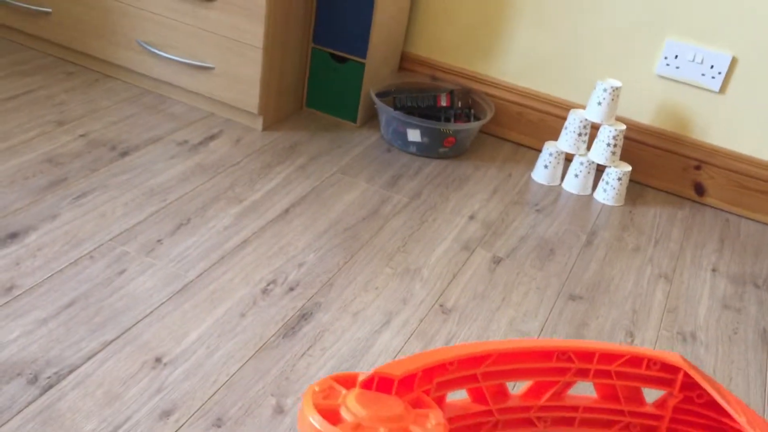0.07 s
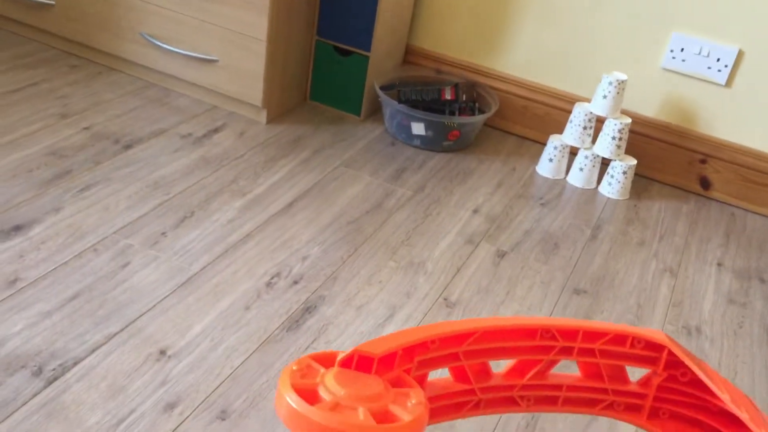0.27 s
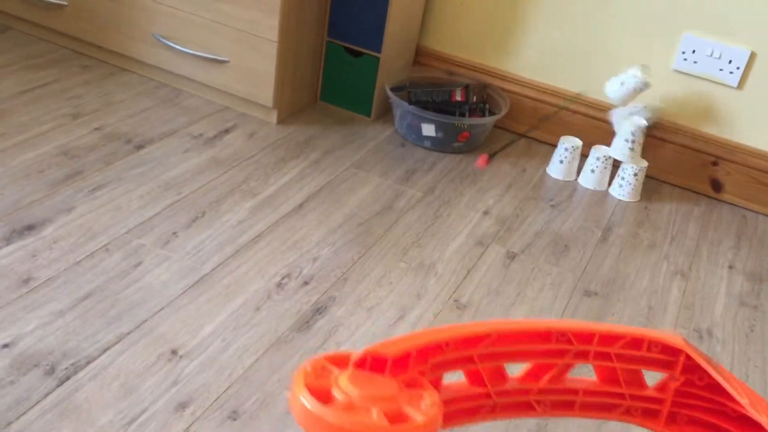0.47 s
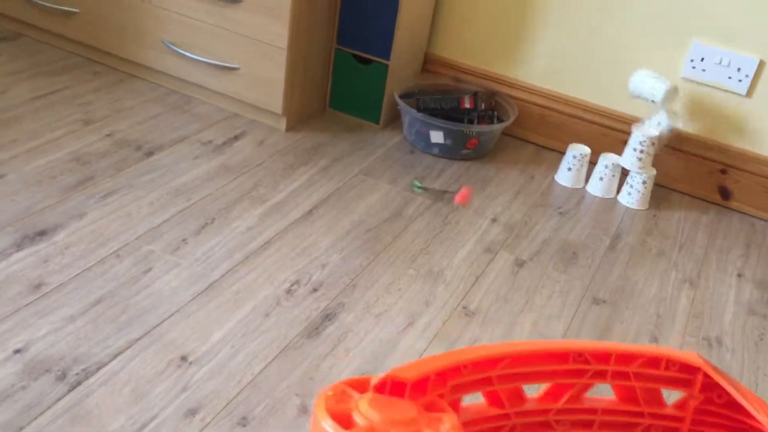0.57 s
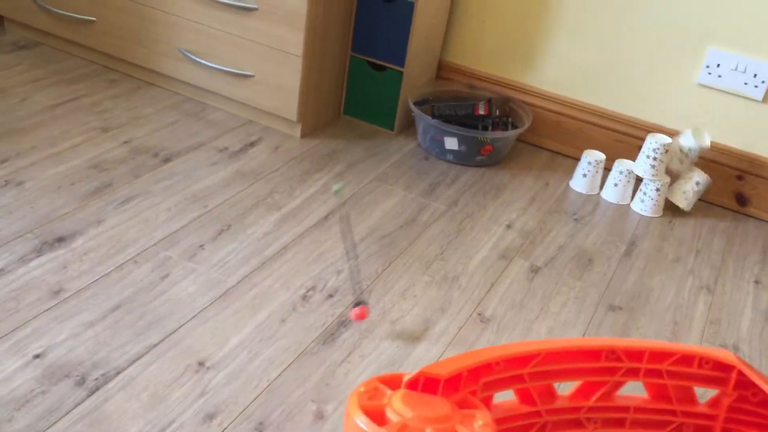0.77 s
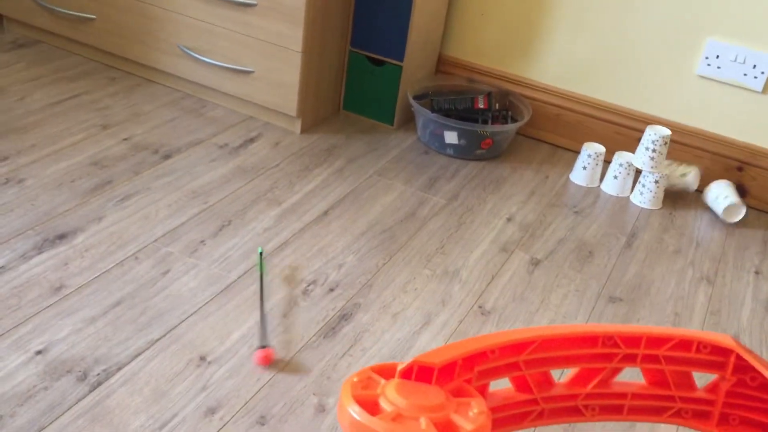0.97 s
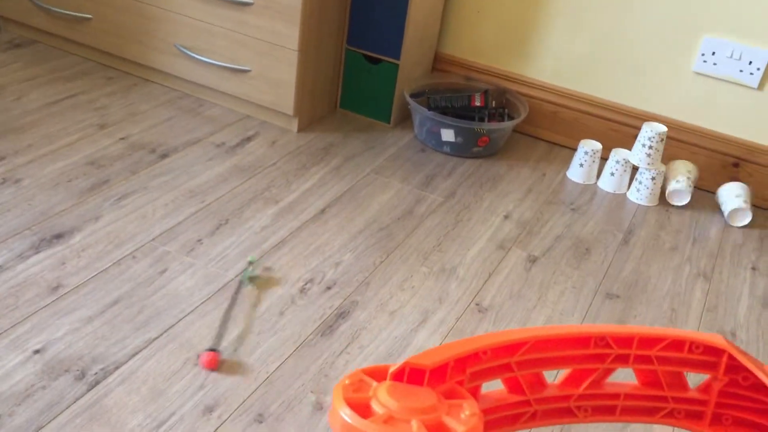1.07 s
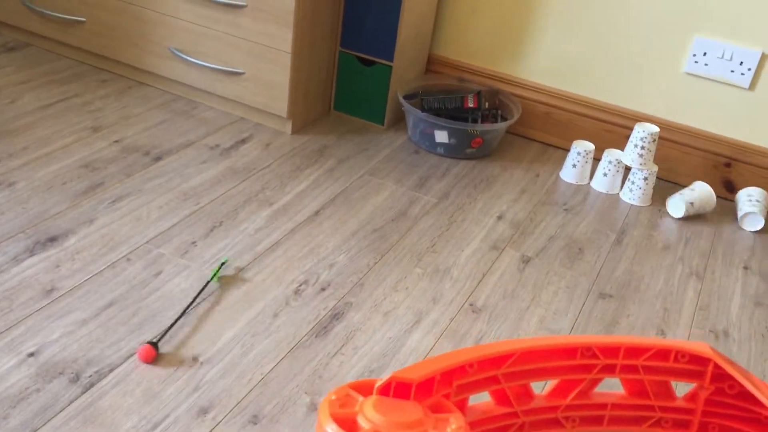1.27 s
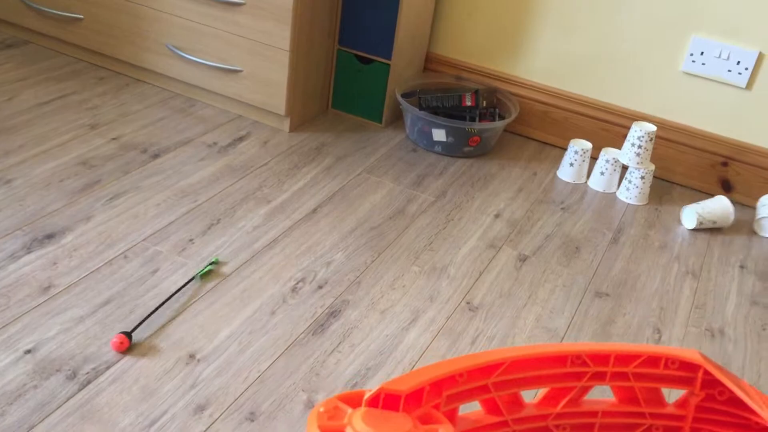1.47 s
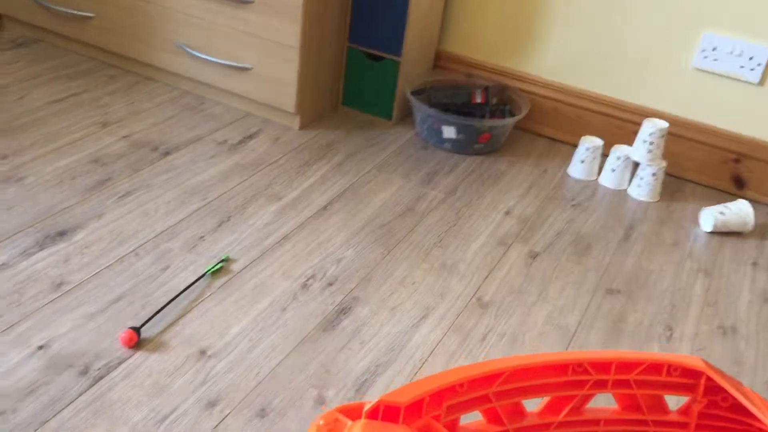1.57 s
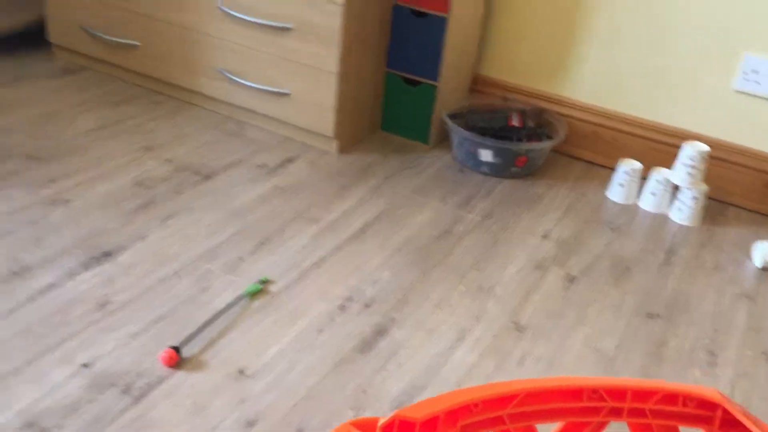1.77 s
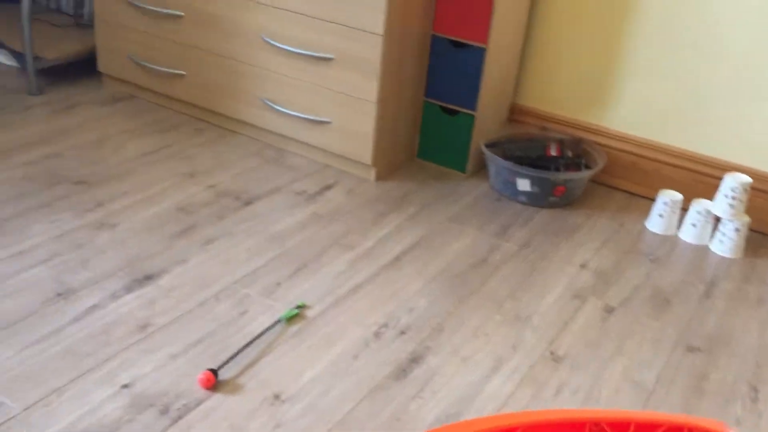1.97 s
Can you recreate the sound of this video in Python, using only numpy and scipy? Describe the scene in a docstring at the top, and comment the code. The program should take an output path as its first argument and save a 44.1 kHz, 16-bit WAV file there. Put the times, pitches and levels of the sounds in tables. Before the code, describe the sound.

Close, slightly overloaded snap of a toy crossbow after a small catch click, followed by a light knock and scattered hollow paper cup taps, scraping and rolling on a hard floor, with short room reverberation.

```python
"""Toy crossbow and paper cups

A plastic toy crossbow is cocked and fired at a stack of paper cups in a small room with a hard floor.
Filtered noise bursts excite the frame and cup walls; decaying sines give string twangs and hollow cup notes.
Rough contact shakes the rolling cups and the floor boards, and scrapes what slides.
Every blow gets a decaying noise tail from the room; a faint hum, hiss and fading sound lie under all."""
import sys
import numpy as np
from scipy import signal
from scipy.fft import rfft, irfft, next_fast_len
from scipy.io import wavfile
from scipy.ndimage import map_coordinates

SR = 44100
rng = np.random.default_rng(int(sys.argv[2]) if len(sys.argv) > 2 else 0)


def generate_wav(signal):
    """Clip the signal to [-1, 1] and save it as 16-bit WAV at the path in sys.argv[1]."""
    frames = np.transpose(np.atleast_2d(signal))
    scaled = np.clip(frames, -1, 1) * 32767
    pcm = np.round(scaled).astype(np.int16)
    wavfile.write(sys.argv[1], SR, pcm)


N = 88332
SPAN = SR // 16  # samples held by one blow before the room answers
BOW_WET_DB = -3.5  # energy of the room's answer relative to a blow of the bow or catch

# Modes of a cup's paper wall: f/Hz, width/Hz, gain/dB
CUP_WALL = [(1142.5, 60, 7), (1790, 30, 6), (2113, 23, -0.5), (2493, 42, 6), (3106, 120, 4),
            (4940, 120, 5.5), (5690, 210, 0)]


def amp(db):
    """Level law: decibels to amplitude gain."""
    return 10 ** (np.asarray(db) / 20)


def unit(x):
    """Normalisation: each row at rms 1."""
    return x / np.sqrt(np.mean(x ** 2, axis=-1, keepdims=True) + 1e-20)


def energy(x):
    """Energy norm: root of the summed squares of each row."""
    return np.linalg.norm(x, axis=-1, keepdims=True) + 1e-20


def along(points, hz):
    """Logarithmic interpolation: (Hz, value) points joined on a log frequency axis."""
    f, v = np.transpose(points)
    return np.interp(np.log(hz + 1), np.log(f + 1), v)


def curve(rows):
    """Amplitude envelope: gain per sample from (s, dB) rows, down to -120 dB outside them."""
    s, db = np.transpose(rows)
    return amp(np.interp(np.arange(N) / SR, s, db, left=-120, right=-120))


def filtered(x, response):
    """Linear filtering: the spectrum of x times a complex response of frequency."""
    m = next_fast_len(x.shape[-1] + SR // 4)
    spectrum = rfft(x, m) * response(np.fft.rfftfreq(m, 1 / SR))
    return irfft(spectrum, m)[..., :x.shape[-1]]


def noise(spectrum, size):
    """Spectral shaping: white noise coloured by a curve, at rms 1."""
    return unit(filtered(rng.standard_normal(size), lambda hz: amp(along(spectrum, hz))))


def resonances(peaks):
    """Modal superposition: damped second-order resonators of alternating sign, causal."""
    def response(f):
        total = 0
        for k, (centre, width, db) in enumerate(peaks):
            damping = 1j * f * width
            total = total + (-1) ** k * amp(db) * damping / (centre * centre - f * f + damping)
        return total
    return response


def ringing(x, peaks):
    """Forced vibration: x together with the resonances that it excites."""
    return x + filtered(x, resonances(peaks))


def wobble(rate):
    """Random modulation: a smooth curve through random knots, rate knots a second."""
    knots = rng.standard_normal(int(N * rate / SR) + 4)
    return map_coordinates(knots, [np.arange(N) * rate / SR])


def even(puff, count):
    """Spectral evening: noise under an envelope, its spectrum's levels halved in dB to soften chance peaks."""
    z = rfft(puff * rng.standard_normal((count, SPAN)))
    return irfft(z / np.sqrt(np.abs(z) + 1e-12), SPAN) * (puff > 1e-2)


def burst(spectrum, count, rise_s, fall_s, tilt_db=0):
    """Impact noise: short puffs, one a row, through a minimum-phase (causal) colour filter."""
    t, hz = np.arange(SPAN) / SR, np.fft.rfftfreq(2 * SPAN, 1 / SR)
    rise = 1 - np.exp(-(t / np.maximum(rise_s, 1e-4)) ** 2)
    puff = rise * np.exp(-t / np.maximum(fall_s, 1e-4))
    colour = amp(along(spectrum, hz) + tilt_db * np.log2((hz + 100) / 3000))
    low_cut = np.minimum(hz / spectrum[0][0], 1) ** 3
    gain = unit(colour * low_cut + 1e-6)
    # folding the cepstrum onto positive times makes the filter minimum-phase
    cepstrum = irfft(np.log(gain))
    cepstrum[..., 1:SPAN] *= 2
    cepstrum[..., SPAN + 1:] = 0
    rows = irfft(rfft(even(puff, count), 2 * SPAN) * np.exp(rfft(cepstrum)))[:, :SPAN]
    return rows * energy(puff) / energy(rows)


def note(db, hz, rise_s, t60_s):
    """Damped oscillation: a sine that swells and dies exponentially, by 60 dB in t60_s."""
    t = np.arange(SPAN) / SR
    swell = 1 - np.exp(-(t / rise_s) ** 2)
    return amp(db - 60 * t / t60_s) * swell * np.sin(2 * np.pi * hz * t)


def in_room(times, blows, wet_db):
    """Reverberation: each blow is convolved with its own noise tail, decaying at a rate set by frequency."""
    # Reverberation time of the room: f/Hz, t60/s
    decay = [(150, 0.5), (600, 0.45), (1500, 0.39), (4000, 0.31), (10000, 0.25), (15000, 0.29)]
    build_up_s = 0.0035
    hz, t, z = signal.stft(rng.standard_normal((len(blows), SR // 2)), SR, nperseg=256)
    tails = signal.istft(z * amp(-60 * t / along(decay, hz)[:, None]), SR, nperseg=256)[1]
    tails *= 1 - np.exp(-(np.arange(tails.shape[1]) / SR / build_up_s) ** 2)
    heard = signal.fftconvolve(blows, tails, axes=1)
    heard *= amp(wet_db) * energy(blows) / energy(heard)
    heard[:, :SPAN] += blows  # the direct sound
    out = np.zeros(N + SR)
    for s, row in zip(times, heard):
        out[round(s * SR):][:len(row)] += row
    return out[:N]


def crossbow():
    """Impulsive excitation: noise clicks ring the plastic frame; the slipping string gives damped sines."""
    # Trigger, snap and rattle of the shot: t/s, level/dB, rise/s, fall/s, brightness/(dB per octave)
    clicks = [(0.411, -35.5, 0.0013, 0.0083, 2), (0.4378, -5, 0.0012, 0.0051, -0.5),
              (0.447, -9, 0.00042, 0.0098, 0.34), (0.4518, 3, 0.0021, 0.0046, 3.5),
              (0.4693, -8, 0.0018, 0.004, 1), (0.481, -22.5, 0.0013, 0.0029, -4)]
    # Colour of the clicks: f/Hz, level/dB (per Hz)
    click_colour = [(24, -60), (40, -36), (297, -9), (503, -14), (630, 0), (896, -4.5), (1210, -2.5),
                    (1850, -3.5), (2380, -7), (3220, -2), (8770, -12), (16000, -27.5)]
    # Modes of the plastic frame, before their common gain: f/Hz, width/Hz, gain/dB
    frame = [(1860, 160, -9), (3780, 300, -15), (4070, 47, -5.5), (6300, 27, -9.5), (6360, 570, -7),
             (8130, 29, -7)]
    # Short notes as the string slips: t/s, level/dB, f/Hz
    slips = [(.413, -35, 2150), (0.426, -37, 1100), (0.4342, -29, 1120)]
    frame_db = 7  # common gain of the frame modes
    s, db, rise, fall, tilt_db = np.transpose(clicks)[:, :, None]
    crack = amp(db) * burst(click_colour, len(s), rise, fall, tilt_db)
    blows = crack + amp(frame_db) * filtered(crack, resonances(frame))
    when, twang_db, hz = np.transpose(slips)[:, :, None]
    twangs = note(twang_db, hz, rise_s=0.0011, t60_s=0.053)
    return in_room(np.vstack([s, when])[:, 0], np.vstack([blows, twangs]), BOW_WET_DB)


def landings():
    """Impact: a bright crack and a knock ring the cup wall, while a thud sounds the floor."""
    # Arrow and cups striking floor, wall and each other:
    # t/s, crack level/dB, knock level/dB, thud level/dB, crack brightness/(dB per octave), crack fall/s
    strikes = [(0.5595, -8, -9, -22.5, -3.5, 0.0027), (0.5662, -13.5, -11.5, -21, 16, 0.002),
               (0.585, -24, -20, -41, 3, 0.0024), (0.5954, -28, -30, -24.5, 11, 0.0021),
               (0.611, -12, -18.5, -51, -2, 0.0015), (0.619, -15.5, -35, -34, 0.1, 0.002),
               (0.7569, -39.5, -32.5, -34.5, 10, 0.0054), (0.8077, -21, -16, -24.5, -5, 0.0035),
               (0.816, -18.5, -22.5, -54, -3, 0.0035), (0.827, -21, -40, -24.5, -3.3, 0.0047),
               (0.84, -29, -25, -30.5, 0.5, 0.0025), (0.8644, -18.5, -19, -23, 3, 0.0038),
               (0.944, -29.5, -42, -28, -0.5, 0.0074), (0.9508, -11, -23.5, -45, -3.6, 0.0031),
               (1.037, -19.5, -29, -42, 2.5, 0.0019), (1.083, -27.5, -36, -33.5, -11, 0.004),
               (1.1046, -16, -17, -37.5, -0.6, 0.002), (1.1128, -33, -14.5, -37, 3.5, 0.0011),
               (1.1434, -25, -26.5, -40, -3, 0.0033), (1.16, -27, -32, -57, -17.5, 0.0045),
               (1.207, -26.5, -33, -32, 3.5, 0.003), (1.233, -24.5, -24, -48, 3.5, 0.002),
               (1.287, -27.5, -28.5, -63, 5.5, 0.0023), (1.3177, -25.5, -34.5, -39.5, -2.5, 0.0018),
               (1.3284, -25, -50, -36.5, 0, 0.0022), (1.3765, -27, -39.5, -55, 3, 0.0019),
               (1.379, -28.5, -41, -68, -1.5, 0.0032), (1.4193, -24.5, -34.5, -43.5, -0.5, 0.0022),
               (1.4359, -30.5, -59.5, -42, -3, 0.0032), (1.4815, -30, -32.5, -51, -0.9, 0.0029),
               (1.5243, -28, -51, -56, 1, 0.0018), (1.557, -37, -59, -51, 0, 0.0028)]
    # Colours of crack, knock and floor-board thud: f/Hz, level/dB (per Hz)
    crack_colour = [(1290, -13), (2200, -5.5), (3970, -7.5), (5130, -6), (7390, -3), (9330, -8),
                    (10700, -14.5), (16000, -33)]
    knock_colour = [(260, -32), (450, -14), (703, -4.5), (1140, -7), (2340, -14.5), (4550, -37),
                    (7700, -120)]
    thud_colour = [(80, -32.5), (209, -8), (296, -6), (362, -11), (600, 2.5), (780, -25), (1320, -120)]
    contact_s = 0.00094  # rise of a contact
    knock_s, thud_s = 0.0035, 0.0075  # decay constants of the puffs, to 1/e
    s, crack_db, knock_db, thud_db, tilt_db, crack_s = np.transpose(strikes)[:, :, None]
    crack = amp(crack_db) * burst(crack_colour, len(s), contact_s, crack_s, tilt_db)
    knock = amp(knock_db) * burst(knock_colour, len(s), contact_s, knock_s)
    thud = amp(thud_db) * burst(thud_colour, len(s), contact_s, thud_s)
    return in_room(s[:, 0], ringing(crack + knock, CUP_WALL) + thud, wet_db=-2)


def hollow_notes():
    """Cavity resonance: the air in a struck or rocked cup sounds one short damped note."""
    # Cup notes, timed when the note has swelled: t/s, level/dB, f/Hz
    cup_notes = [(0.561, -9, 675), (0.57, -22, 636), (0.603, -33, 740), (0.616, -21, 643),
                 (0.632, -12, 754), (0.649, -21.5, 782), (0.669, -12.5, 754), (0.838, -18.5, 744),
                 (0.868, -2, 723), (0.883, -15, 624), (0.894, -8, 720), (0.905, -13.5, 733),
                 (0.945, -15, 614), (0.958, -12, 714), (0.974, -12.5, 724), (1.035, -16.5, 700),
                 (1.08, -21, 620), (1.106, -13, 746), (1.145, -19.5, 700), (1.209, -7.5, 714),
                 (1.223, -13.5, 772), (1.233, -17, 720), (1.267, -15.5, 784), (1.296, -22, 650),
                 (1.32, -10.5, 757), (1.33, -12, 773), (1.355, -22.5, 870), (1.3765, -17.5, 707),
                 (1.421, -19.5, 745), (1.453, -19.5, 743), (1.484, -21, 743), (1.513, -21, 733)]
    rise_s, t60_s = 0.0033, 0.047
    s, db, hz = np.transpose(cup_notes)[:, :, None]
    return in_room(s[:, 0] - rise_s, note(db, hz, rise_s, t60_s), wet_db=-4.5)


def catch():
    """Impulsive excitation: the catch clicks home in noise bursts that ring its body."""
    # Clicks of the catch: t/s, level/dB, rise/s, fall/s, brightness/(dB per octave)
    clicks = [(0.164, -61, .001, 0.024, 2.3), (0.192, -44, 0.004, 0.012, 0.5), (.2, -10, 0.0043, 0.0046, 6),
              (0.208, -22.5, 0.0017, 0.0052, -1.5), (0.23, -25, .003, 0.0034, -3),
              (0.277, -32, 0.0018, 0.0019, 0)]
    # Colour of the clicks: f/Hz, level/dB (per Hz)
    click_colour = [(71, -69.5), (120, -44), (301, -11.5), (385, -20.5), (592, -7.5), (1120, -7.5),
                    (1720, -10), (4230, -12.5), (9400, -28.5), (16000, -56)]
    # Modes of the catch's body: f/Hz, width/Hz, gain/dB
    body = [(591, 40, 0), (1170, 160, 10), (2030, 69, 5)]
    s, db, rise, fall, tilt_db = np.transpose(clicks)[:, :, None]
    click = amp(db) * burst(click_colour, len(s), rise, fall, tilt_db)
    return in_room(s[:, 0], ringing(click, body), BOW_WET_DB)


def rolling():
    """Roughness excitation: an uneven floor shakes rolling cups and boards, and scrapes what slides."""
    # Cups rolling and rocking: t/s, level/dB
    roll_level = [(0.5, -82), (0.612, -57), (0.888, -50), (1.018, -33.5), (1.336, -65), (1.436, -36),
                  (1.658, -52.5), (1.854, -59), (2.003, -57)]
    # Resonances of a rolling cup, passed twice: f/Hz, width/Hz, gain/dB (each pass)
    cup_modes = [(742, 92, -5.5), (839, 93, -4), (643.4, 170, -7)]
    # Cups and arrow sliding: t/s, level/dB
    skid_level = [(0.6, -36), (0.668, -36.5), (0.878, -63), (1.03, -48.5), (1.288, -44), (1.39, -47.5),
                  (1.47, -55), (1.606, -51), (1.682, -69.5), (1.85, -82)]
    # Colour of the scrape: f/Hz, level/dB (per Hz)
    scrape_colour = [(1120, -19), (1900, -5.5), (3020, -3), (5490, -7), (9290, -9.5), (16000, -46.5)]
    # The floor under all that rolls: t/s, level/dB
    rumble_level = [(0.8, -37), (0.906, -30.5), (1.016, -39.5), (1.366, -39), (1.476, -39.5), (1.55, -42),
                    (1.62, -42.5), (1.74, -62), (1.9, -73)]
    # Colour of the boards: f/Hz, level/dB (per Hz)
    board_colour = [(88, -59.5), (150, -49.5), (375, -10), (519, -12.5), (761, -6.5), (1080, -3),
                    (1820, -23), (2400, -24), (3120, -54), (5280, -120)]
    bumps_per_s, bumps_db = 90, 2  # unevenness of the floor: knots/s, dB per unit of wobble
    grit_per_s, grit_db = 400, 2.5  # tiny irregular contacts of what slides: the same units

    def bumps():
        """Amplitude modulation: a fresh random profile of the floor."""
        return amp(bumps_db * wobble(bumps_per_s))

    shaken = filtered(bumps() * rng.standard_normal(N), resonances(cup_modes))
    cups = unit(filtered(shaken, resonances(cup_modes))) * curve(roll_level)
    scrape = amp(grit_db * wobble(grit_per_s)) * noise(scrape_colour, N)
    sliding = unit(ringing(scrape, CUP_WALL)) * curve(skid_level)
    boards = unit(bumps() * noise(board_colour, N)) * curve(rumble_level)
    return cups + sliding + boards


def background():
    """Stationary noise and decay: hiss, a hum wavering in level and pitch, and an earlier sound dying."""
    # Colour of the hiss: f/Hz, level/dB (per Hz)
    hiss_colour = [(20, -30.5), (60, -11.5), (120, -21.5), (200, -18.5), (400, -20.5), (590, -6.5),
                   (800, -17), (1300, -19.5), (2500, -27), (4000, -28), (9000, -33.5), (16000, -40.5)]
    # Resonances of an earlier sound dying in the room: f/Hz, width/Hz, gain/dB
    fading_modes = [(114.5, 40, -1), (606, 35, 4), (730, 60, -2.5), (1475, 27, 3), (1680, 120, -4),
                    (1980, 180, -8.5)]
    hiss_db, hum_db, fading_db = -64.5, -67.5, -50  # hiss rms, hum amplitude, fading sound at the start
    hum_hz, waver_hz, waver_db = 106.6, 5, 3.5  # mean pitch; Hz and dB per unit of wobble
    fading_t60_s = 0.39
    hiss = amp(hiss_db) * noise(hiss_colour, N)
    hum_phase = 2 * np.pi * np.cumsum(hum_hz + waver_hz * wobble(27)) / SR
    hum = amp(hum_db) * amp(waver_db * wobble(36)) * np.sin(hum_phase)
    decay = amp(fading_db - 60 * np.arange(N) / SR / fading_t60_s)
    fading = decay * unit(filtered(rng.standard_normal(N), resonances(fading_modes)))
    return hiss + hum + fading


def scene():
    """Superposition: all sources add at one microphone."""
    return (crossbow() + landings() + hollow_notes() + catch() + rolling() + background())[None]


def record(dry):
    """Transducer response: microphone colour, soft saturation of the peaks, then a band limit."""
    # Frequency response of the microphone: f/Hz, gain/dB
    mic_response = [(20, -11), (70, 2), (8000, -4), (9400, -0.5), (10100, -6), (16000, -5)]
    ceiling, knee = .72, 6  # amplitude limit and sharpness of the soft overload
    top_hz = 15900
    x = filtered(dry, lambda hz: amp(along(mic_response, hz)))
    rounded = x / (1 + np.abs(x / ceiling) ** knee) ** (1 / knee)
    return filtered(rounded, lambda hz: hz < top_hz)


dry = scene()
out = record(dry)
generate_wav(out)
```